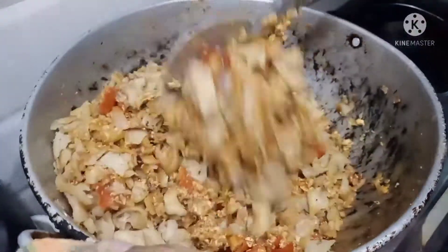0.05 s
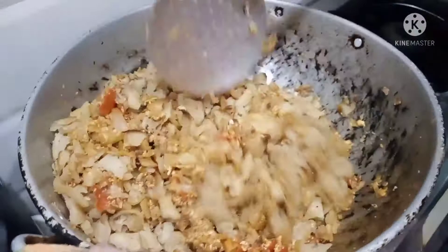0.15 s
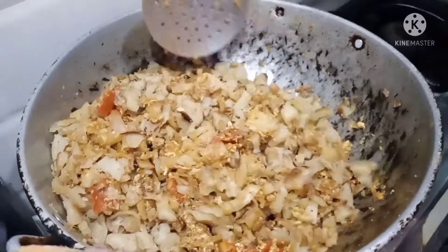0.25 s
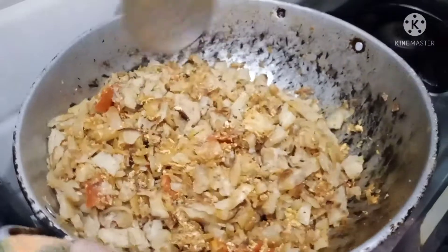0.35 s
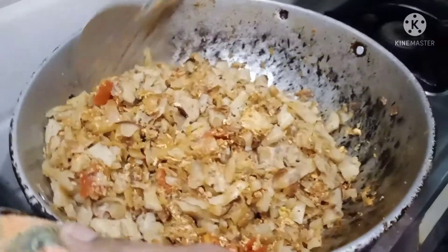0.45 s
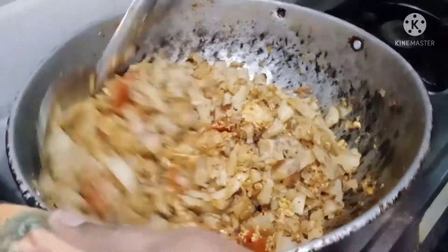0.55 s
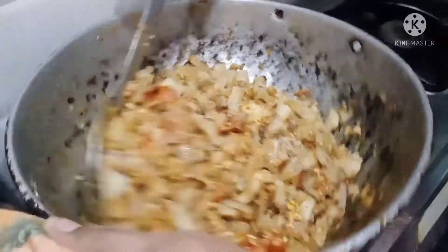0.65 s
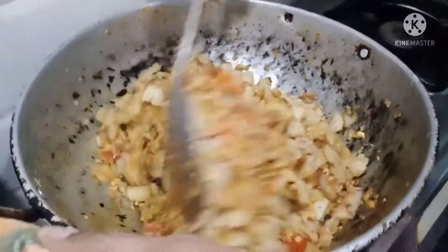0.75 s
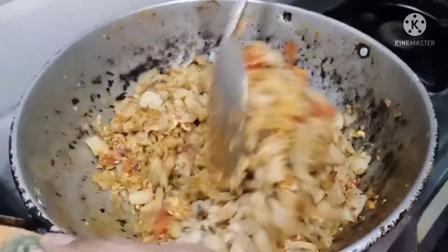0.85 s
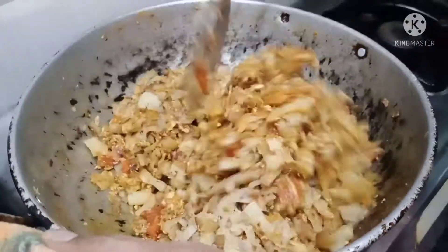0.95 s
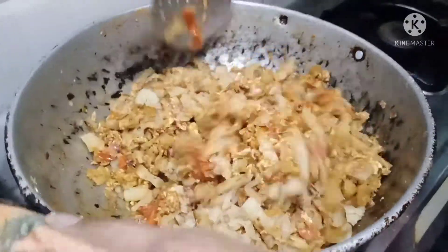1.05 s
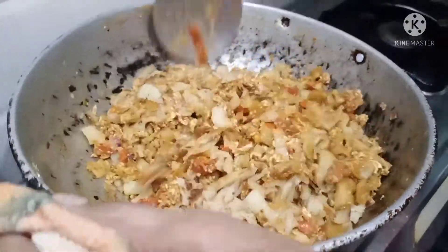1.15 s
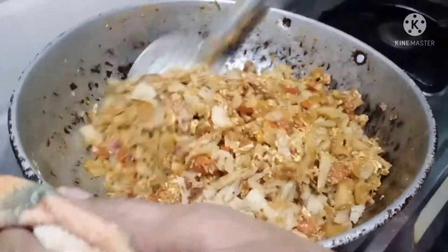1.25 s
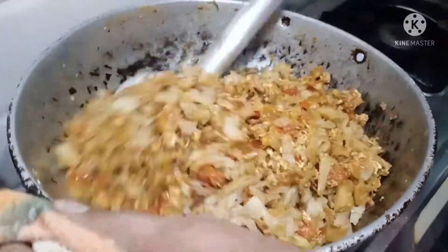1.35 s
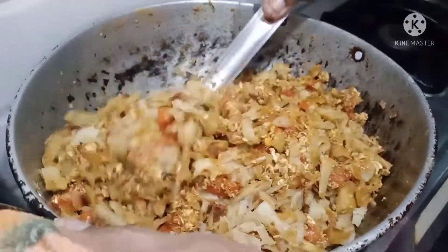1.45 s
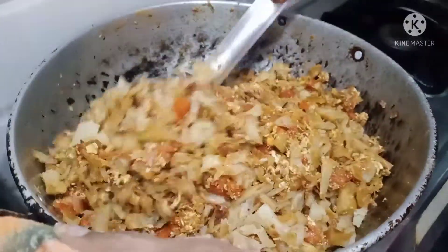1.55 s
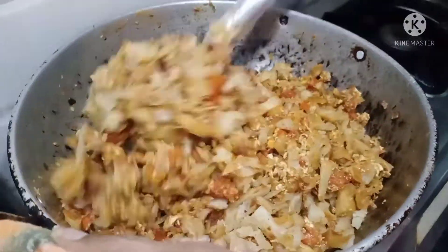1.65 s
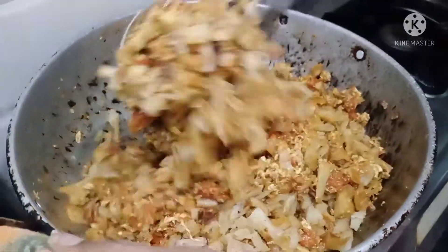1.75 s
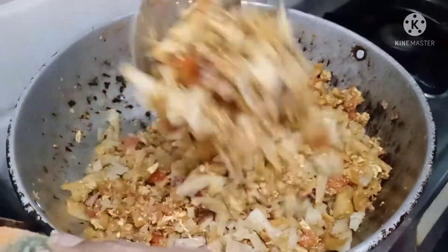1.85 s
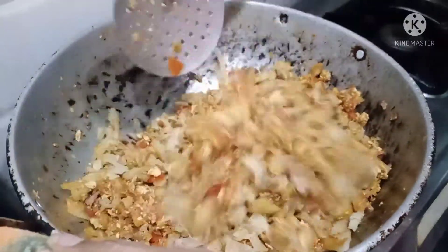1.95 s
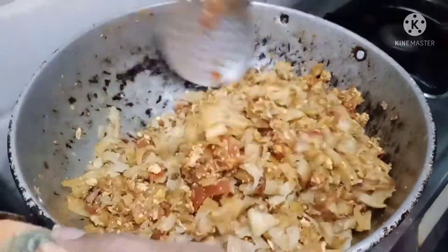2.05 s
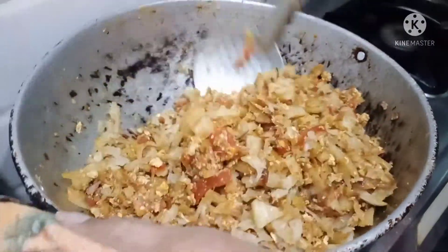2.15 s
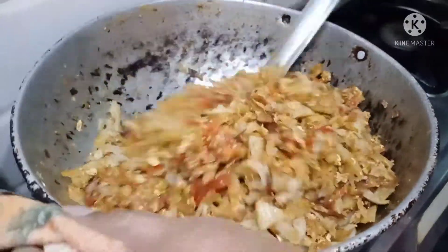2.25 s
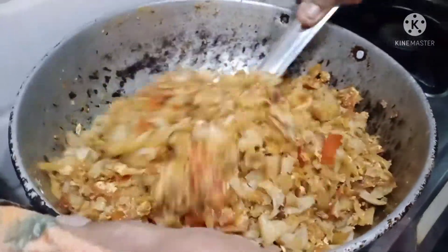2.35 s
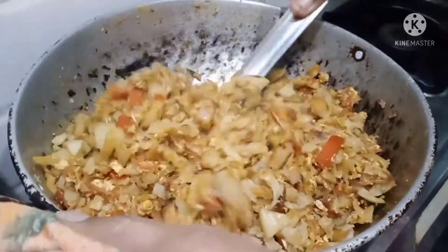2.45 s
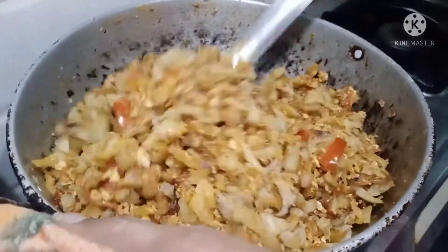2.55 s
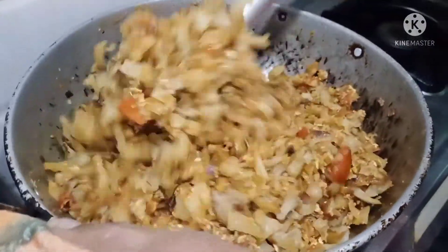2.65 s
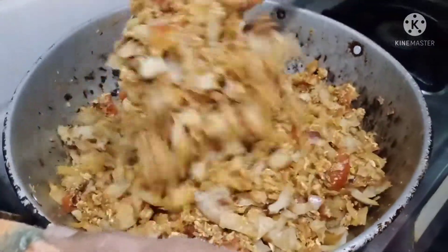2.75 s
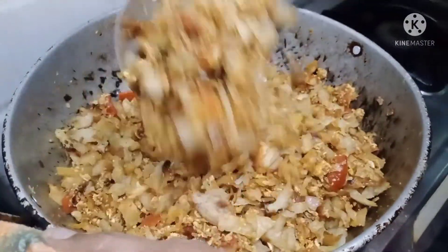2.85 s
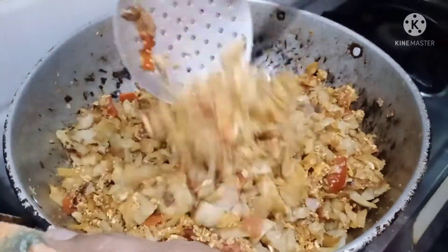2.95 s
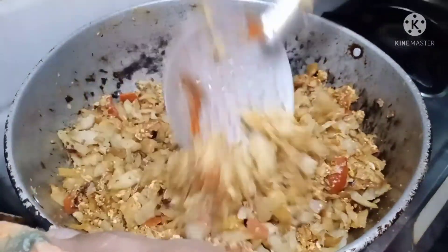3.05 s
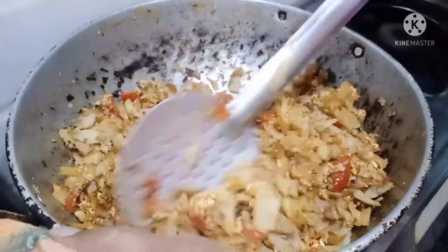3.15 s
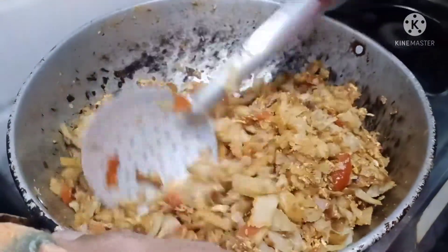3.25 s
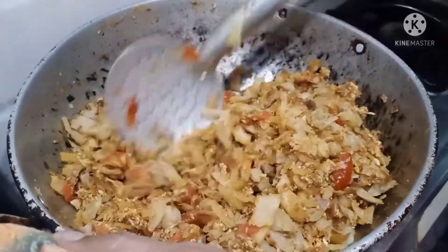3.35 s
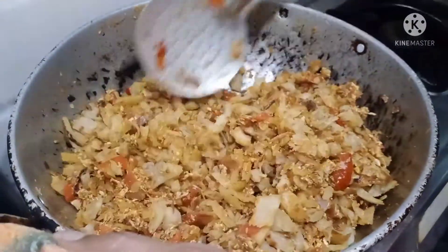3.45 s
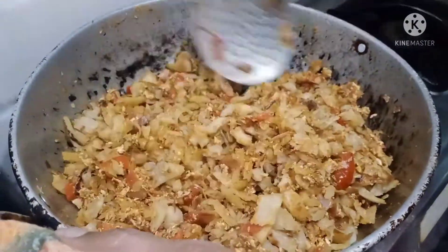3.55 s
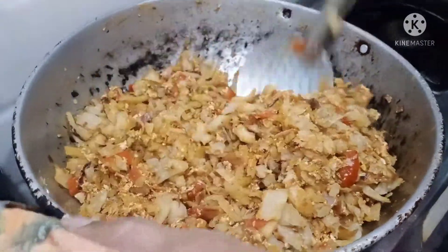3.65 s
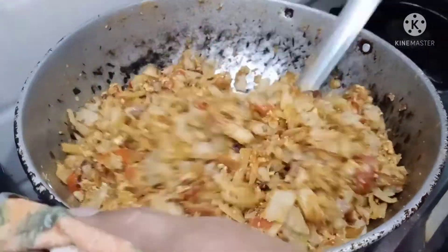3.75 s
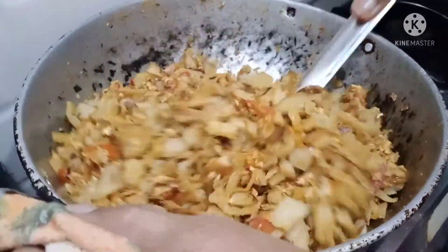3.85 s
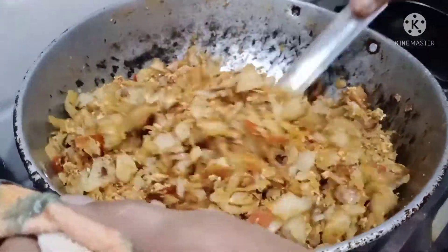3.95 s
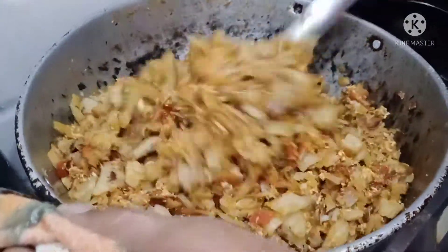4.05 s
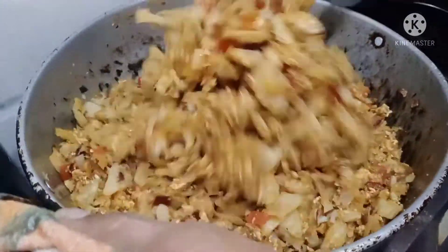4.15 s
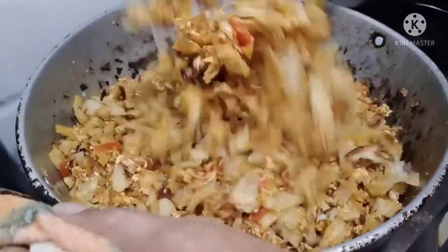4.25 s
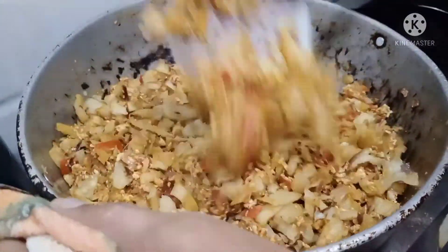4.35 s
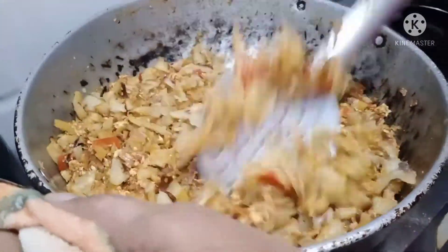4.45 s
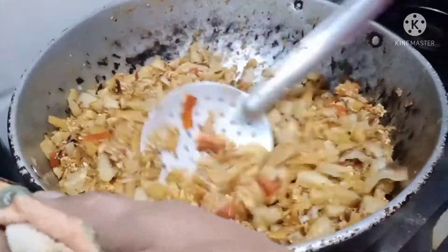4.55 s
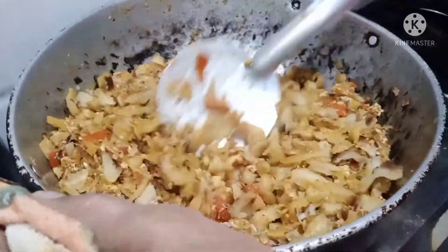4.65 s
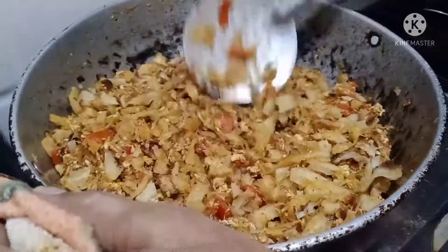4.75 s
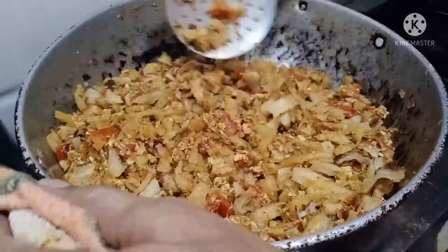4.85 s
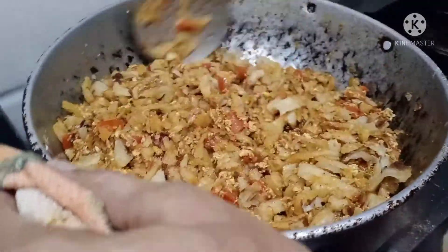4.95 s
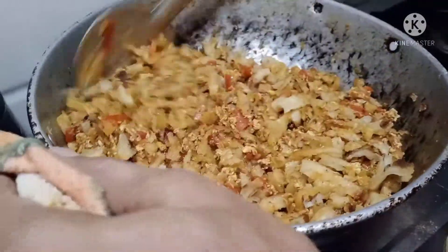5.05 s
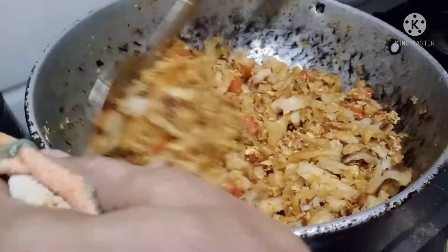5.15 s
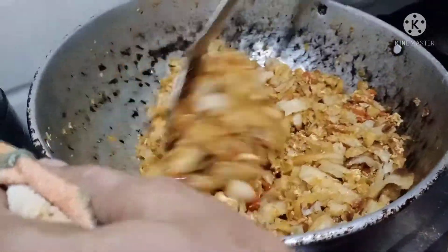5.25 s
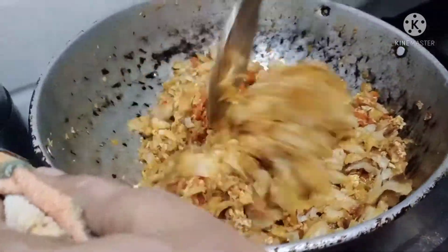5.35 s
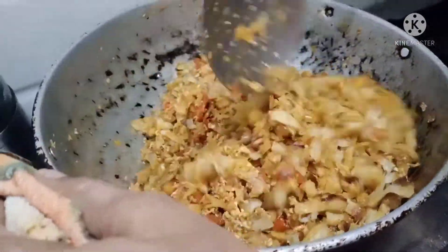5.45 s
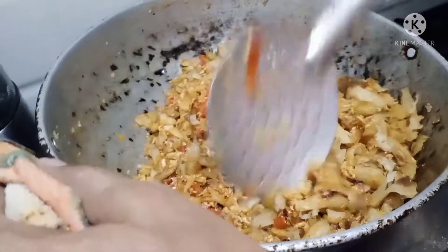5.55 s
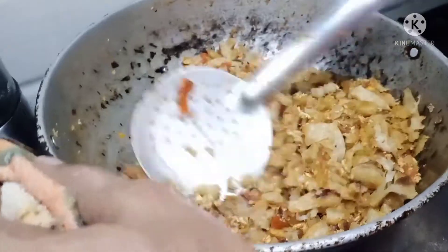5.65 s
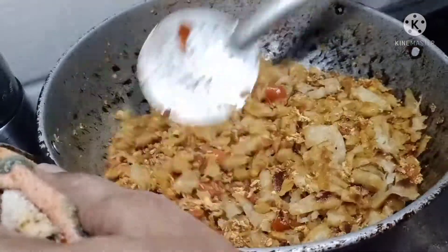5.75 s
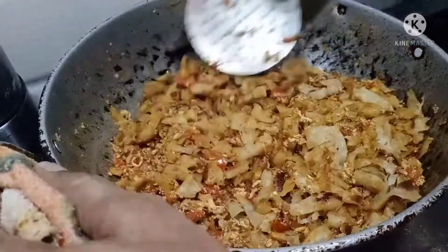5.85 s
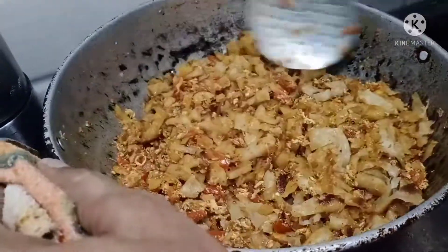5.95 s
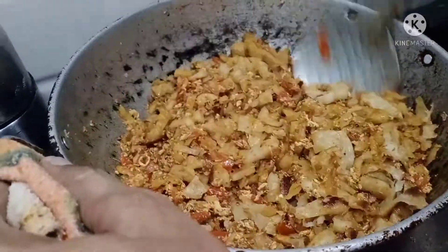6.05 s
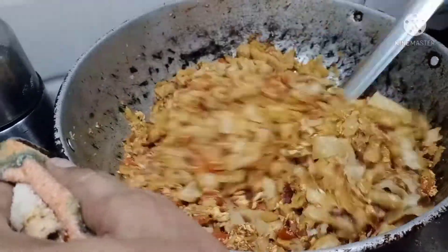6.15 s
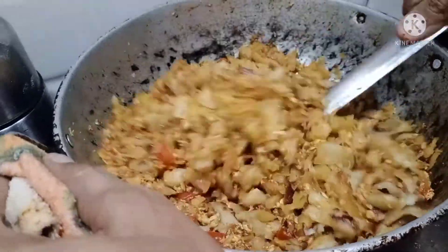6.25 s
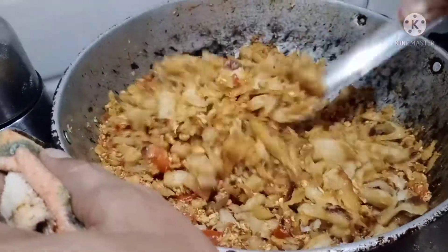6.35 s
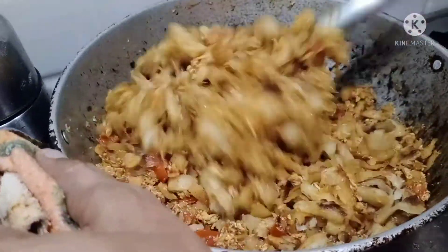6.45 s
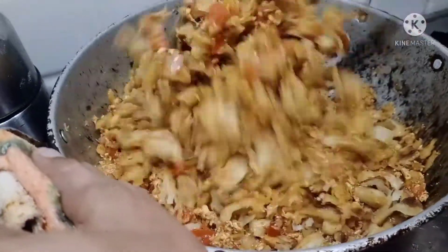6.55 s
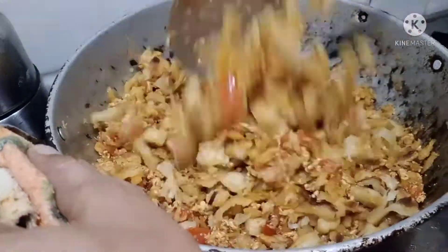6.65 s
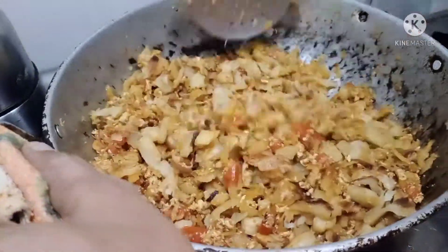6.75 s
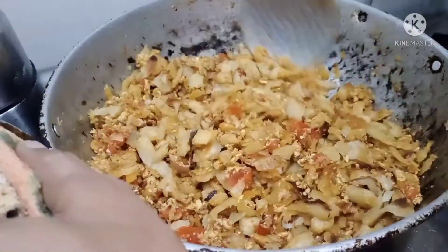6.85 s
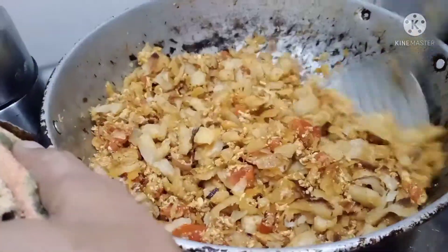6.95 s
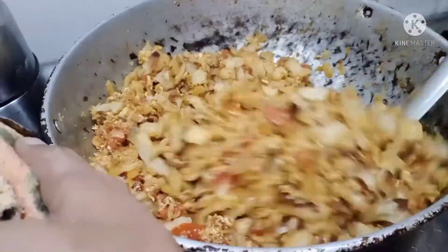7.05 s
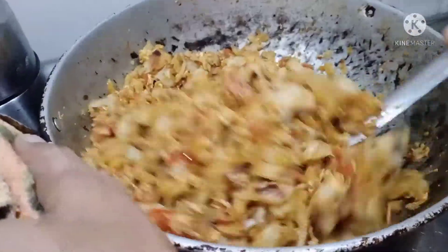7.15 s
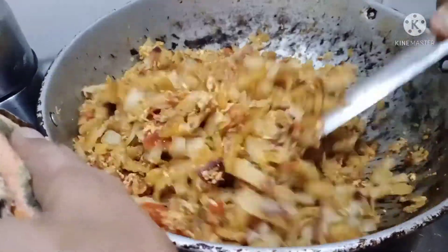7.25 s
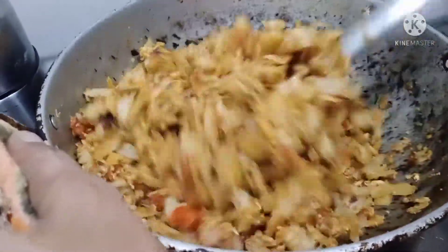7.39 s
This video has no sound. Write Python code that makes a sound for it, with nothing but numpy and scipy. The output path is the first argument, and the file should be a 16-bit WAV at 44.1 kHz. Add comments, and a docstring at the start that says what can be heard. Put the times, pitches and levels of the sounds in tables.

```python
"""A small kitchen, a metal pan on the stove, a small microphone; a little room sound follows each touch of metal.
First a steel ladle turns chopped food: it knocks on the wall and scrapes in quick slips that now and then squeal,
with soft dull thuds, low rings of the bowl and narrow wavering tones in a faint rustle of food and ladle. Wet food
then swishes on the hot wall, and a hand shifts its grip with low rubbing and bumps. From 5.1 s bared hot metal
sizzles and spits as the ladle works on: filtered noise for the food, ringing modes for the pan, sines for squeals."""
import sys
import numpy as np
from scipy import signal
from scipy.fft import rfft, irfft
from scipy.io import wavfile
from scipy.ndimage import uniform_filter1d

SR = 44100
rng = np.random.default_rng(int(sys.argv[2]) if len(sys.argv) > 2 else 0)


def persist_wave(psi):
    """Save psi, clipped to +-1, as 16-bit WAV."""
    counts = np.round(np.clip(psi, -1, 1) * 32767).astype(np.int16)
    wavfile.write(sys.argv[1], SR, np.atleast_2d(counts).T)


N = 327221
TIME = np.arange(N) / SR
RING_SIZE = SR // 3
RING_TIME = np.arange(RING_SIZE) / SR
STROKE_TIME = np.arange(SR * 3 // 4) / SR

# still kitchen air, relative spectrum: pitch_hz, level_db
AIR_COLOUR = [(20, -11), (50, -14.5), (76, -7), (100, 8), (130, -1), (270, -0.5), (400, -6), (700, -14),
              (1300, -7), (2000, -16.5), (4000, -20), (6000, -43), (9000, -46.5), (16000, -40.5)]
AIR_DB, HUM_HZ, HUM_DB, HUM_WAVER_DB = -68, 105, -74.5, 4

# hand rubbing as it shifts its grip: middle_s, length_s, level_db
RUBS = [(4.33, 0.16, -54.5), (4.435, 0.17, -43.5), (4.575, 0.11, -51), (4.78, 0.18, -45.5),
        (5.2, 0.25, -43.5), (5.436, 0.16, -51), (5.587, 0.24, -54.5), (5.845, 0.21, -50)]
# colour of that rubbing, relative spectrum: pitch_hz, level_db
GRIP_COLOUR = [(20, -14), (45, -19), (70, -2), (115, 0.5), (170, -9), (280, -23), (600, -66)]
# soft bumps of the hand: start_s, level_db (before the common boost and the softened onset)
BUMPS = [(4.075, -32.5), (4.106, -42.5), (5.326, -35.5), (5.359, -37.5), (5.595, -35.5), (5.668, -46)]

# colour of the faint rustle of food and ladle, relative spectrum: pitch_hz, level_db
RUSTLE_COLOUR = [(900, -3), (2150, 1.5), (2450, -5.5), (2850, -1), (3700, 0), (4150, -2.5), (4600, -4.5),
                 (5400, -3.5), (7200, -26.5), (7900, -9), (9500, -32), (11200, -28), (12300, -18.5),
                 (15500, -39.5)]
# swells of the rustle: middle_s, length_s, level_db, favoured_hz
RUSTLE_SWELLS = [(0.08, 0.3, -69.5, 3720), (1.9, 1, -81, 2460), (2.752, 0.33, -66.5, 4600),
                 (2.891, 0.11, -63, 3420), (3.029, 0.33, -64, 4570), (3.359, 0.56, -62, 2330),
                 (3.761, 0.48, -70.5, 3450), (4.669, 0.35, -65, 4430), (5.109, 0.18, -65.5, 4300)]
# narrow, wavering tones in the rustle: pitch_hz, width_hz, mean_boost_db
RUSTLE_TONES = [(2487, 47, 9.5), (3340, 90, 3.5), (3700, 49, 5.5), (4520, 100, 7), (5320, 85, 4.5),
                (6470, 80, 12)]
RUSTLE_DB = -77.21   # the steady rustle, before the narrow tones

# wet food sliding down the hot wall: middle_s, length_s, level_db, pitch_hz
SWISHES = [(2.675, 0.37, -73.5, 5220), (2.78, 0.23, -60.5, 4500), (2.819, 0.27, -67.5, 2480),
           (2.877, .12, -59, 3130), (2.899, 0.43, -67, 3710), (3.03, 0.39, -73, 5350),
           (3.103, .42, -65, 4600), (3.022, 0.27, -65, 3850), (3.304, 0.23, -65.5, 1910),
           (3.386, .46, -62.5, 2440), (3.459, .42, -67, 3610)]
SWISH_WIDTH_HZ, SWISH_FLICKER_DB = 130, 4

# colours of the open sizzle, relative spectra: pitch_hz, level_db
SPLUTTER_COLOUR = [(900, -50), (1900, -25), (2500, -11), (3100, 7), (3800, 2), (4600, -12), (6500, -33.5)]   # wet spluttering
HISS_COLOUR = [(2400, -49), (3400, -8), (4100, 10), (4800, -1), (5700, 8), (6500, 2), (7800, -6.5),
               (9300, -24.5), (11000, -27), (16000, -29)]
MIST_COLOUR = [(7000, -9.5), (9500, -16.5), (11300, -24), (12500, -1), (14500, 0), (16000, 2.5)]   # fine mist
FLASH_COLOUR = [(3000, -33), (4200, -2), (4800, 4), (5400, 5), (6800, -30)]   # first flash of steam off the bared metal
# swell of the flash, heard only once the metal is bared: middle_s, length_s, level_db
FLASH = (5.12, 3.1, -49)
# growth of each layer: build_up_s, overshoot_db, settled_db, flare_db (relative to the ladle's rasp);
# the overshoot ends when the build-up does; a negative build-up ramps over its size without overshoot
SPLUTTER_RISE = (1.3, 11, -52, -41)
HISS_RISE = (1.27, 8, -52, -6)
MIST_RISE = (-1.5, 2, -56, -18.5)
HISS_START_S, MIST_START_S, SPLUTTER_START_S = 5.125, 5.47, 5.63
SIZZLE_SETTLE_S = 0.023   # time constant of the overshoot dying away
# zones of the open sizzle that swell and fade on their own: pitch_hz, width_hz, mean_boost_db
SIZZLE_ZONES = [(2900, 170, -3.5), (4100, 1100, -6.5), (4400, 430, 0), (5650, 550, 0), (5800, 950, -0.5),
                (7360, 330, -2.5)]

# single spits of oil: start_s, peak_db
SPITS = [(5.1295, -25.5), (5.275, -27), (5.361, -32), (5.4975, -25), (5.5225, -37), (5.583, -37),
         (5.597, -32.5), (5.682, -31), (5.698, -37)]
# colour of a spit, relative spectrum: pitch_hz, level_db
SPIT_COLOUR = [(1000, -3), (3000, -9), (5500, 15), (7500, -9), (9500, -17), (13000, -2), (16000, -4)]

# single modes of pan and ladle: pitch_hz, relative_level_db, t60_s
MODES_OF_PAN = [(227, -1, 0.35), (242, -2, 0.17), (302, 0, 0.15), (403, 0.5, 0.12), (418.3, -1.5, 0.13),
                (592, -12.5, 0.11), (662, -3, 0.2), (766, 3, 0.19), (876, 0.5, 0.16), (950, 0.5, 0.068),
                (1050, -4, 0.013), (1212, -3.5, 0.1), (1358, -1, 0.053), (1515, -2, 0.11), (1646, -7, 0.15),
                (2046, -3.5, 0.12), (2140, -22, 0.056), (2756, -3.5, 0.066), (3095, -7, 0.23),
                (3392, -4, 0.047), (3670, -2.5, .13), (4083, -2, 0.057), (4240, -13, 0.18),
                (4460, -6, 0.068), (5330, -7, 0.13), (5870, -20, 0.061), (6600, -18, 0.083)]
# the pan's many close, short-lived modes together, relative spectrum: pitch_hz, level_db
DENSE_MODES = [(30, -55), (60, -31.5), (110, -21), (175, -10.5), (235, -3), (310, -0.5), (410, -5.5),
               (650, -2), (950, -2), (1750, -4), (2100, 3.5), (2500, 0.5), (3700, 1), (5700, -1.5),
               (7000, -15.5), (9000, -30.5), (13500, -33), (16000, -29)]
BOWL_HZ, WALL_HZ, EDGE_HZ = (35, 750), (750, 1900), (1900, 16000)
PART_CENTRES_HZ = (280, 1105, 3260)   # bowl, wall, edge

# soft, dull thuds and low after-rings in the pan: start_s, hold_s, bowl_level_db, wall_level_db
THUDS = [(0.183, 0.12, -48, -53), (0.356, 0.045, -59, -76), (1.06, 0.1, -61, -73), (1.161, .02, -53.5, -66),
         (1.908, 0.027, -53.5, -59), (1.97, 0.024, -67, -79), (2.941, 0.066, -53, -54.5),
         (3.022, 0.011, -61.5, -77), (4.249, 0.015, -47, -60), (5.28, 0.013, -46.5, -56),
         (5.446, 0.079, -61, -62), (5.537, 0.03, -50, -60), (5.849, 0.025, -47.5, -53),
         (6.59, 0.066, -54.5, -68)]
THUD_RISE_S, THUD_SAG_DB, THUD_T60_S = 0.02, 5, 0.23
# pushes of the ladle over the metal: start_s, rise_s, hold_s, sag_db, release_t60_s,
# bowl_boom_db, wall_clang_db, edge_rasp_db, rasp_hz
SCRAPES = [(0.466, .008, 0.044, -1.5, 0.092, -39.5, -44.5, -63, 2110),
           (0.529, 0.027, 0.16, 11, 0.17, -36.5, -29.5, -28.5, 2980),
           (0.706, 0.0075, 0.013, 5, .23, -35, -32.5, -43, 4270),
           (0.813, 0.014, 0.087, 4.5, 0.25, -28, -26.5, -38, 2290),
           (1.35, 0.0059, 0.043, 2, 0.3, -42.5, -43.5, -48.5, 3840),
           (1.392, 0.043, 0.099, 7.5, 0.14, -41, -35.5, -34, 3750),
           (2.209, 0.0043, 0.1, -1, 0.26, -40.5, -36, -47.5, 2220),
           (2.268, 0.039, 0.084, 1.5, 0.35, -39, -40.5, -33.5, 4680),
           (2.397, 0.012, 0.041, 2, 0.2, -38.5, -36.5, -37.5, 3900),
           (3.799, 0.047, 0.027, 4, 0.14, -58.5, -50, -49, 2370),
           (3.908, 0.0055, 0.052, 7, 0.057, -57.5, -65, -35.5, 3650),
           (5.13, 0.019, 0.078, 1.5, 0.18, -38.5, -39.5, -29.5, 4700),
           (5.192, 0.011, 0.024, 4, 0.049, -46, -47, -30.5, 5530),
           (6.121, 0.036, 0.029, 3, 0.24, -36, -34, -36, 5140),
           (6.206, 0.0089, 0.062, 3.5, 0.14, -37.5, -38.5, -30, 3350),
           (6.292, 0.0064, 0.095, 10.5, 0.3, -41, -44.5, -25.5, 3300),
           (6.965, 0.01, 0.028, 5, 0.92, -39, -45.5, -37.5, 3500),
           (7.036, 0.024, 0.12, 3, 0.36, -38.5, -42, -23, 4400),
           (7.202, 0.022, 0.034, 4, 0.28, -50.5, -41.5, -24.5, 3180)]
# how steeply bowl, wall and edge follow the pressure (exponents): an easing stroke dulls
PRESSURE_POWERS = (0.72, 1, 1.07)
CLANG_HZ = 938   # the wall's favourite pitch under a push
# how much the edge favours a push's own pitch, and over what share of that pitch
RASP_FOCUS_DB, RASP_SPREAD = 0.5, 0.57

# squeals of slipping metal, and a few soft low rings of the bowl:
# start_s, rise_s, hold_s, sag_db, first_hz, last_hz, level_db (before flutter)
SQUEALS_AND_BOWL_RINGS = [(0.557, 0.022, 0.19, 14.5, 957, 930, -30),
                          (0.824, 0.011, 0.016, 1.5, 229, 238, -24.5),
                          (0.834, 0.011, .014, 1, 1195, 1210, -27.5),
                          (.843, 0.015, 0.0094, 4, 647, 665, -26),
                          (0.848, 0.0087, 0.015, 7, 2103, 2185, -28.5), (.9, .015, 0.017, 8, 223, 242, -31),
                          (1.442, 0.051, 0.069, 10, 2135, 1990, -37), (1.965, .03, .03, 8, 428, 372, -57),
                          (2.275, 0.032, 0.008, 11, 970, 985, -28.5),
                          (2.99, 0.069, 0.04, 4, 242.6, 252, -51), (3.159, 0.055, .03, 6, 220, 241, -55.5),
                          (3.848, 0.0069, 0.03, 9, 434, 423, -41.5), (3.86, .012, .008, 2, 760, 727, -44),
                          (3.914, .007, 0.042, 3, 2130, 2014, -43.5),
                          (3.911, 0.014, 0.066, 9.5, 3595, 3864, -36.5),
                          (5.132, 0.0088, 0.053, 2, 954, 947, -32),
                          (5.203, 0.025, 0.012, 1, 1006, 1010, -33),
                          (5.14, 0.017, 0.021, 3.5, 4080, 4200, -25.5),
                          (5.139, 0.038, 0.041, 17, 1433, 1430, -37),
                          (6.135, 0.024, 0.015, 5, 231, 221, -25),
                          (6.298, 0.012, 0.059, 4, 3140, 3110, -21),
                          (7.058, 0.018, 0.13, -1, 4380, 2782, -30.5),
                          (7.082, 0.035, .14, -2, 4070, 4060, -33)]
SQUEAL_T60_S = 0.13

# taps cushioned by food: start_s, contact_s, favoured_hz, wall_level_db, bowl_relative_to_wall_db
TAPS = [(0.036, 0.0085, 935, -27, -20), (0.468, 0.0029, 390, -19, 8), (1.362, 0.0082, 650, -20, -2),
        (1.907, 0.0063, 1400, -27.5, -12), (2.0, 0.011, 384, -47.5, 14), (3.899, 0.0052, 374, -33.5, 20.5),
        (3.92, 0.0066, 414, -34, 12.5), (4.257, 0.0046, 417, -30, -1), (5.138, 0.0069, 1010, -7.5, -24),
        (5.17, .014, 710, -8, -4), (5.314, 0.011, 1080, -14.5, 0), (5.435, 0.023, 1405, -17, -5),
        (5.58, .005, 1450, -24, -16), (5.596, 0.0032, 605, -16.5, 4.5), (5.852, 0.011, 950, -29, -2),
        (6.046, 0.013, 990, -27, -7), (6.598, .008, 1450, -23, -7), (6.783, 0.0054, 1590, -20.5, -23),
        (6.973, .01, 473, -30, 8)]
CUSHION_HZ = 1830   # food between ladle and metal swallows what lies above this

# bare ladle blows: start_s, favoured_hz, nearest_part_level_db,
# loss_db_per_octave (away from that part), crack_t60_s
BLOWS = [(0.039, 4740, -23, 12, 0.12), (0.540, 2820, -8.5, 5, 0.019), (0.8203, 1120, -2.5, 1.5, 0.025),
         (0.881, 1240, -3.5, 9, .03), (1.2619, 960, 5, 4, 0.065), (1.364, 2330, -17, -2, 0.045),
         (1.586, 3900, -20.5, 3.5, .04), (2.2107, 960, 2.5, 5, 0.019), (2.272, 3800, -16.5, 4, .03),
         (2.404, 3380, -2.5, 26, .05), (2.859, 2960, -29, 11, .05), (3.913, 3680, -10, 18, 0.069),
         (3.925, 3730, -9, 11.5, 0.022), (3.977, 3770, -12, 14, 0.021), (5.157, 4540, -8, 29, 0.05),
         (5.698, 5600, -18.5, 13, 0.02), (5.842, 1550, -7.5, 4, 0.12), (6.033, 5430, -16.5, 14, 0.04),
         (6.1256, 5330, 6.5, 4, 0.074), (6.218, 3360, -5, 1.5, 0.046), (6.295, 4340, 3.5, 8.5, 0.071),
         (6.316, 2950, 5, 24, 0.011), (6.666, 3700, -5.5, 35.5, 0.03), (6.782, 2900, -11.5, 10, 0.026),
         (7.044, 4000, -2, 4, 0.057), (7.062, 4300, -6, 8, 0.026), (7.074, 6200, 0, 6, 0.031),
         (7.219, 3100, -1, 19, 0.052), (7.251, 4430, 0, 15, 0.026), (7.34, 3004, -11, 37, 0.069)]

CUTOFF_HZ = 15800


def from_db(db):
    """Amplitude factor of a level in dB."""
    return 10 ** (np.asarray(db) / 20)


def rms_one(x):
    """Scales x to an RMS of one."""
    return x / np.sqrt(np.mean(x ** 2) + 1e-20)


def energy_one(x):
    """Scales x to a total energy of one."""
    return x / np.sqrt(np.sum(x ** 2) + 1e-20)


def decay(t, t60):
    """Exponential decay that falls 60 dB in t60 seconds."""
    return np.exp(-np.log(1000) * t / t60)


def add(out, s, x):
    """Mixes x into out from second s on."""
    start = max(0, round(s * SR))
    out[start:start + len(x)] += x[:max(0, N - start)]


def band(x, edges):
    """Keeps the band between two edges in Hz."""
    return signal.sosfilt(signal.butter(6, edges, "band", fs=SR, output="sos"), x)


def resonance(x, hz, width_hz):
    """Passes x through one resonance."""
    return signal.lfilter(*signal.iirpeak(hz, hz / width_hz, fs=SR), x)


def colour(x, spectrum):
    """Causal (minimum-phase) filter with the given (Hz, dB) spectrum."""
    size = 4096
    hz, db = np.transpose(spectrum)
    bins_hz = np.arange(size + 1) * SR / (2 * size)
    log_gain = np.log(from_db(np.interp(np.log(bins_hz + 1), np.log(hz), db)))
    # folding the cepstrum onto positive times makes the phase minimal
    cepstrum = irfft(log_gain)[:size] * np.r_[1, np.full(size - 1, 2)]
    impulse = irfft(np.exp(rfft(cepstrum, 2 * size)))[:size]
    return signal.fftconvolve(x, impulse)[:len(x)]


def wander(t, rate):
    """Random line that heads for a new normal value `rate` times a second."""
    steps = (t - t[0]) * rate
    return np.interp(steps, np.arange(4096), rng.standard_normal(4096))


def grains(size, per_s, spread_db):
    """Random clicks of uneven size and sign."""
    clicks = rng.random(size) < per_s / SR
    signs = rng.choice([-1, 1], size)
    return clicks * signs * from_db(spread_db * np.clip(rng.standard_normal(size), -2, 2))


def hump(middle, length, db):
    """Gain over time of one smooth swell."""
    return from_db(db) * np.cos(np.pi / 2 * np.clip(2 * (TIME - middle) / length, -1, 1)) ** 2


def stroke(rise_s, hold_s, sag_db, release_t60):
    """Gain of one push or tone: it rises, sags while it is held, and is released."""
    held = STROKE_TIME - rise_s
    rise = np.clip(STROKE_TIME / rise_s, 0, 1)
    sag = from_db(-sag_db * np.clip(held / hold_s, 0, 1))
    return rise * sag * decay(np.maximum(held - hold_s, 0), release_t60)


def shifting(x, zones, swell_db, swell_rate):
    """Each zone of the spectrum swells and fades on its own."""
    for hz, width_hz, db in zones:
        boost = from_db(db + swell_db * wander(TIME, swell_rate))
        x = x + (boost - 1) * resonance(x, hz, width_hz)
    return x


def kitchen_air():
    """Faint room noise and a low hum that wavers in level and phase."""
    hum_gain = from_db(HUM_DB + HUM_WAVER_DB * wander(TIME, 7.7))
    hum = hum_gain * np.sqrt(2) * np.sin(2 * np.pi * HUM_HZ * TIME + wander(TIME, 7.3))
    return from_db(AIR_DB) * rms_one(colour(rng.standard_normal(N), AIR_COLOUR)) + hum


def handling(boost_db, bump_hz, bump_t60):
    """Low rubbing noise of the shifting hand, and dull bumps: one low, quickly damped tone each."""
    rubbing = rms_one(colour(rng.standard_normal(N), GRIP_COLOUR))
    out = rubbing * sum(hump(*rub) for rub in RUBS)
    t = np.arange(SR // 5) / SR
    soft_onset = 1 - decay(t, 0.0091)
    bump = np.sin(2 * np.pi * bump_hz * t) * decay(t, bump_t60) * soft_onset
    for s, db in BUMPS:
        add(out, s, from_db(db + boost_db) * bump)
    return out


def crackling_noise(gain, spectrum, clicks_per_s, spread_db, flicker_db):
    """Random clicks over noise, given one colour and a quickly flickering level."""
    clicks = rms_one(grains(N, clicks_per_s, spread_db)) + 1.35 * rng.standard_normal(N)
    return rms_one(colour(clicks, spectrum)) * gain * from_db(flicker_db * wander(TIME, 86))


def rustle(clicks_per_s, focus_db, swell_db, swell_rate):
    """Faint rustle of food and ladle; each swell favours a pitch, and narrow tones in it waver in level."""
    steady = crackling_noise(1, RUSTLE_COLOUR, clicks_per_s, spread_db=10.5, flicker_db=3.0)
    out = from_db(RUSTLE_DB) * steady
    for middle, length, db, favoured_hz in RUSTLE_SWELLS:
        focus = resonance(steady, favoured_hz, favoured_hz / 4)
        out = out + hump(middle, length, db) * rms_one(steady + from_db(focus_db) * focus)
    return shifting(out, RUSTLE_TONES, swell_db, swell_rate)


def swishes():
    """Wet food slides over hot metal and hisses briefly in one narrow resonance."""
    out, t = np.zeros(N), STROKE_TIME
    for middle, length, db, hz in SWISHES:
        narrow = resonance(rng.standard_normal(len(t)), hz, SWISH_WIDTH_HZ)
        hiss = rms_one(resonance(narrow, hz, 4 * SWISH_WIDTH_HZ))
        gain = from_db(db + SWISH_FLICKER_DB * wander(t, 35.2))
        swell = np.sin(np.pi * np.clip(t / length, 0, 1)) ** 2
        add(out, middle - length / 2, gain * hiss * swell)
    return out


def vigour(start, rise, rasp):
    """Gain of a sizzle: it builds up, settles, and flares as the ladle drags food over the bared hot metal."""
    build_s, overshoot_db, settled_db, flare_db = rise
    fresh = np.exp(-np.maximum(TIME - start - build_s, 0) / SIZZLE_SETTLE_S)
    build_up = np.clip((TIME - start) / abs(build_s), 0, 1)
    steady = build_up * from_db(settled_db + overshoot_db * fresh)
    flare = from_db(flare_db) * rasp * (TIME >= HISS_START_S)
    return np.hypot(steady, flare)


def open_sizzle(rasp):
    """Flash of steam, hiss, mist and wet spluttering on bare hot metal: countless tiny steam bubbles burst."""
    splutter_gain = vigour(SPLUTTER_START_S, SPLUTTER_RISE, rasp)
    splutter = crackling_noise(splutter_gain, SPLUTTER_COLOUR, clicks_per_s=2900, spread_db=-7, flicker_db=3.0)
    flash_gain = hump(*FLASH) * (TIME >= HISS_START_S)
    flash = crackling_noise(flash_gain, FLASH_COLOUR, clicks_per_s=1800, spread_db=-1, flicker_db=2.5)
    hiss_gain = vigour(HISS_START_S, HISS_RISE, rasp)
    hiss = crackling_noise(hiss_gain, HISS_COLOUR, clicks_per_s=1200, spread_db=2, flicker_db=3.5)
    mist_gain = vigour(MIST_START_S, MIST_RISE, rasp)
    mist = crackling_noise(mist_gain, MIST_COLOUR, clicks_per_s=3000, spread_db=2, flicker_db=3.0)
    return shifting(splutter + flash + hiss + mist, SIZZLE_ZONES, swell_db=3.5, swell_rate=8.5)


def spits():
    """A drop bursts in the oil with a dry tick of fast-dying noise."""
    out = np.zeros(N)
    t = np.arange(SR // 50) / SR
    for s, db in SPITS:
        tick = colour(rng.standard_normal(len(t)) * decay(t, 0.004), SPIT_COLOUR)
        add(out, s, from_db(db) * tick / np.max(np.abs(tick)))
    return out


def mode_rings():
    """Free ring of every mode of the pan, one per row."""
    hz, db, t60 = np.transpose(MODES_OF_PAN)[:, :, None]
    return from_db(db) / np.sqrt(t60) * np.sin(2 * np.pi * hz * RING_TIME) * decay(RING_TIME, t60)


def pan_response(rings, spot_hz, spot_db, crack_t60, modes_db, room_db, room_t60):
    """Answer of bowl, wall and edge to one touch; each spot weighs the modes anew and favours its own pitches."""
    weights = from_db(2.34 * rng.standard_normal(len(rings))) * rng.choice([-1, 1], len(rings))
    modes = weights @ rings
    crack = energy_one(rng.standard_normal(RING_SIZE) * decay(RING_TIME, crack_t60))
    room_swell = 1 - decay(RING_TIME, 0.01)   # the kitchen answers a moment later
    kitchen = energy_one(rng.standard_normal(RING_SIZE) * decay(RING_TIME, room_t60) * room_swell)
    dense = colour(crack + from_db(room_db) * kitchen, DENSE_MODES)
    for hz in spot_hz:
        dense = dense + from_db(spot_db) * resonance(dense, hz, 4 * np.sqrt(hz))
    answers = []
    for edges, db in zip((BOWL_HZ, WALL_HZ, EDGE_HZ), modes_db):
        short, long = band([dense, modes], edges)
        answers.append(energy_one(energy_one(short) + from_db(db) * energy_one(long)))
    return answers


def pan_forces():
    """How hard the pushing ladle drives bowl, wall and edge; thuds and after-rings drive only bowl and wall."""
    power = np.zeros((3, N))
    for s, rise_s, hold_s, sag_db, release_t60, *levels in SCRAPES:
        pressure = stroke(rise_s, hold_s, sag_db, release_t60)
        # the zip stops before the last column, the rasp pitch
        for part, db, steepness in zip(power, levels, PRESSURE_POWERS):
            add(part, s, (from_db(db) * pressure ** steepness) ** 2)
    for s, hold_s, *levels in THUDS:
        thud = stroke(THUD_RISE_S, hold_s, THUD_SAG_DB, THUD_T60_S)
        for part, db in zip(power, levels):
            add(part, s, (from_db(db) * thud) ** 2)
    return np.sqrt(power)


def scrapes_and_thuds(forces, slips_per_s, slip_spread_db, judder_db, judder_rate):
    """The ladle sticks and slips, each slip a tiny blow; thuds sound through the same travelling pan response."""
    out, rings = np.zeros(N), mode_rings()
    spot_s = 0.08   # time from one spot of the pan to the next
    starts, rises, holds, *_, rasps_hz = np.transpose(SCRAPES)
    slips = grains(N, slips_per_s, slip_spread_db) + 0.064 * rng.standard_normal(N)
    slips = slips * from_db(judder_db * wander(TIME, judder_rate))
    # the arm keeps a steady pressure
    slips = slips / np.sqrt(uniform_filter1d(slips ** 2, SR // 60) + 1e-9)
    for middle in np.arange(spot_s, TIME[-1], spot_s):
        near = np.flatnonzero(np.abs(TIME - middle) < spot_s)
        share = np.cos(np.pi / 2 * (TIME[near] - middle) / spot_s)   # one spot fades into the next
        rasp_hz = np.interp(middle, starts + rises + holds / 2, rasps_hz)
        bowl, wall, edge = pan_response(rings, [CLANG_HZ, rasp_hz], spot_db=2.0, crack_t60=0.026,
                                        modes_db=(-1, -3, -3.5), room_db=-15.5, room_t60=0.17)
        focus = resonance(edge, rasp_hz, RASP_SPREAD * rasp_hz)
        edge = energy_one(edge + from_db(RASP_FOCUS_DB) * focus)
        for force, ring in zip(forces, (bowl, wall, edge)):
            push = slips[near] * force[near] * share
            add(out, TIME[near[0]], signal.fftconvolve(push, ring))
    return out


def squeals_and_bowl_rings(waver, flutter_db):
    """Slipping metal squeals, and the bowl rings softly: rough gliding sines, the low ones wavering more slowly."""
    out, t = np.zeros(N), STROKE_TIME
    for s, rise_s, hold_s, sag_db, first_hz, last_hz, db in SQUEALS_AND_BOWL_RINGS:
        glide = np.interp(t, [0, rise_s + hold_s], [first_hz, last_hz])
        pitch = glide * (1 + waver * wander(t, first_hz / 3))
        flutter = from_db(db + flutter_db * wander(t, first_hz / 10))
        swell = stroke(rise_s, hold_s, sag_db, SQUEAL_T60_S) * flutter
        add(out, s, swell * np.sin(2 * np.pi * np.cumsum(pitch) / SR))
    return out


def taps():
    """The ladle lands on a layer of food: the contact is drawn out, and only bowl and wall answer, dully."""
    out, rings = np.zeros(N), mode_rings()
    cushion = signal.butter(6, CUSHION_HZ, fs=SR, output="sos")
    for s, contact_s, spot_hz, db, bowl_db in TAPS:
        bowl, wall, _ = pan_response(rings, [spot_hz], spot_db=23.0, crack_t60=0.032,
                                     modes_db=(-3, -5, -10), room_db=-11, room_t60=0.26)
        press = np.sin(np.pi * np.clip(RING_TIME / contact_s, 0, 1))
        contact = rng.standard_normal(RING_SIZE) * press
        bowl, wall = [energy_one(signal.sosfilt(cushion, signal.fftconvolve(contact, part)))
                      for part in (bowl, wall)]
        add(out, s, from_db(db) * (wall + from_db(bowl_db) * bowl))
    return out


def blows():
    """The ladle lands on bare metal: a crack, then a damped ring; levels fall away from the spot's nearest part."""
    out, rings = np.zeros(N), mode_rings()
    for s, spot_hz, db, loss_db, crack_t60 in BLOWS:
        octaves = np.abs(np.log2(np.array(PART_CENTRES_HZ) / spot_hz))
        response = pan_response(rings, [spot_hz], spot_db=15.0, crack_t60=crack_t60,
                                modes_db=(1, -7, -10), room_db=-7.5, room_t60=0.22)
        # a negative loss lifts the farther parts instead
        part_gains = from_db(db - loss_db * (octaves - octaves.min()))
        add(out, s, part_gains @ np.array(response))
    return out


def scene():
    """Quiet kitchen, hand, food and ladle, mixed to one channel."""
    forces = pan_forces()
    hand = handling(boost_db=7.5, bump_hz=111.0, bump_t60=0.05)
    rustling = rustle(clicks_per_s=500, focus_db=-3.5, swell_db=6.5, swell_rate=13)
    frying = swishes() + open_sizzle(rasp=forces[-1]) + spits()
    scraping = scrapes_and_thuds(forces, slips_per_s=1900, slip_spread_db=2.5, judder_db=5.5, judder_rate=150)
    ladle = scraping + squeals_and_bowl_rings(waver=0.031, flutter_db=5.5) + taps() + blows()
    return (kitchen_air() + hand + rustling + frying + ladle)[None]


def record(dry):
    """The small microphone loses the deep bass; the top is cut steeply."""
    thin = signal.sosfilt(signal.butter(2, 42, "high", fs=SR, output="sos"), dry)
    return signal.sosfilt(signal.ellip(10, .2, 80, CUTOFF_HZ, fs=SR, output="sos"), thin)


dry = scene()
out = record(dry)
persist_wave(out)
```